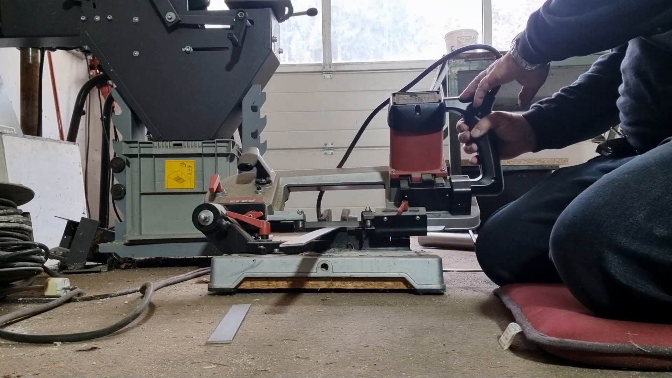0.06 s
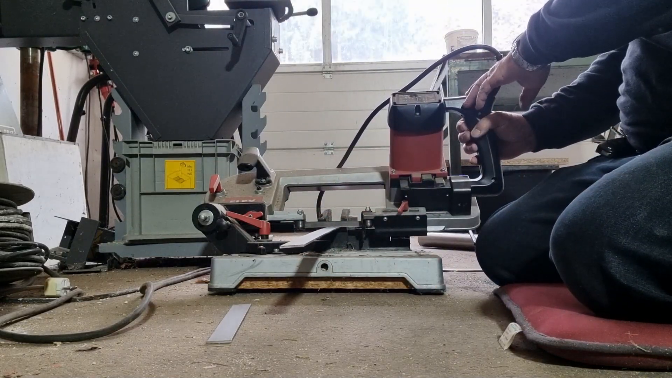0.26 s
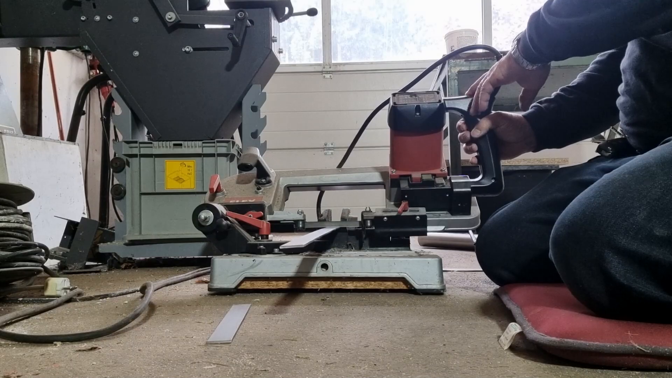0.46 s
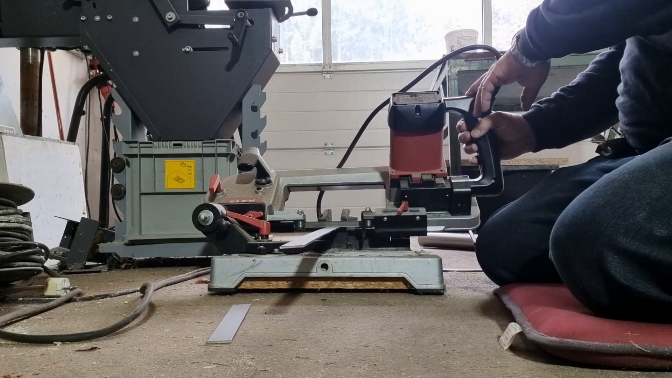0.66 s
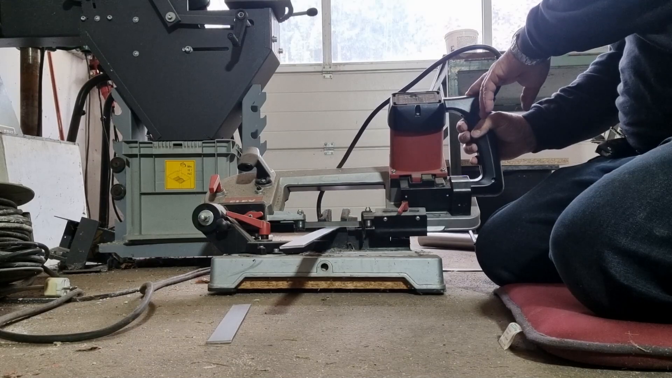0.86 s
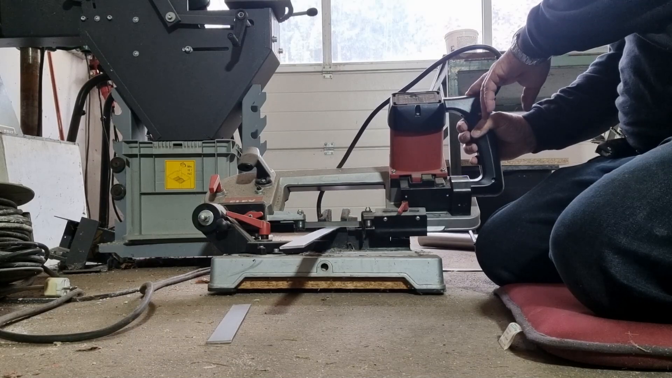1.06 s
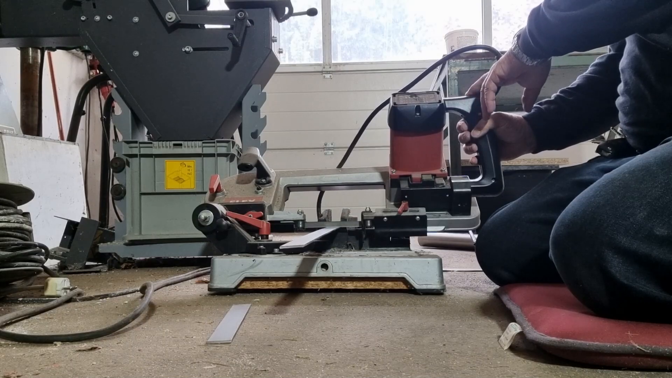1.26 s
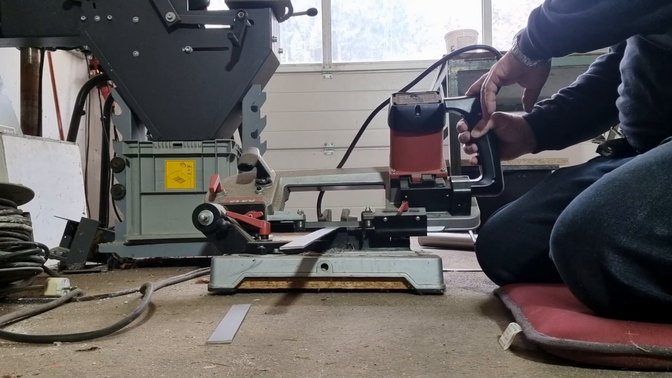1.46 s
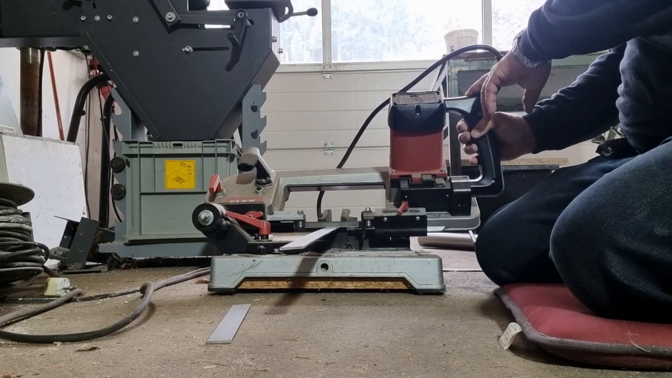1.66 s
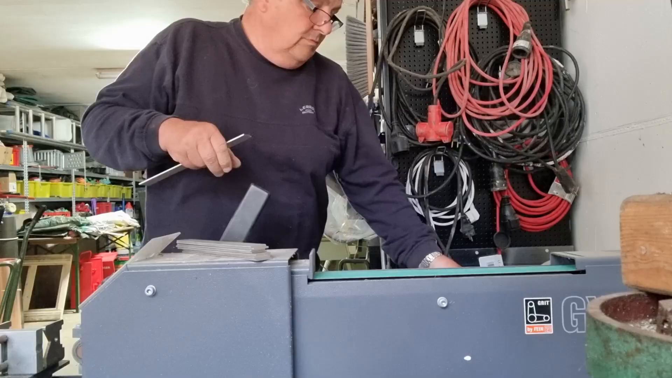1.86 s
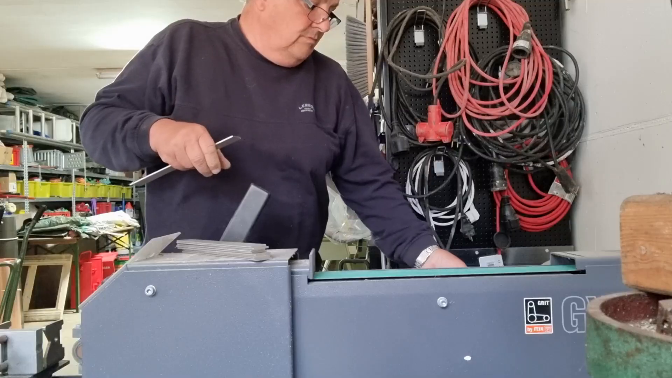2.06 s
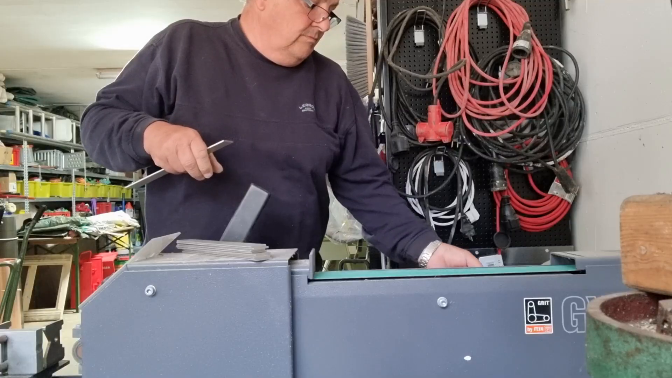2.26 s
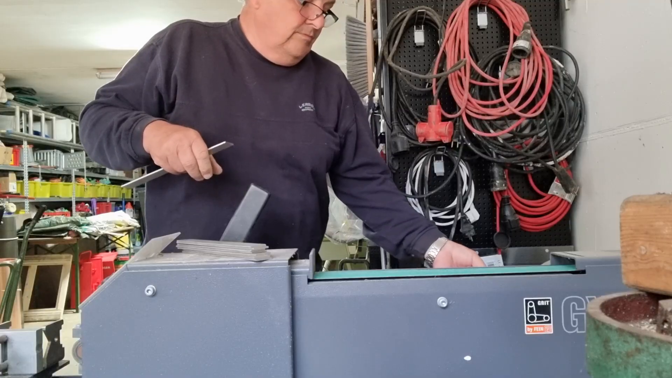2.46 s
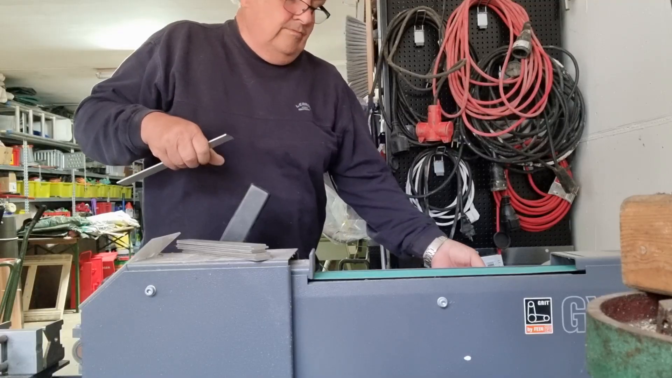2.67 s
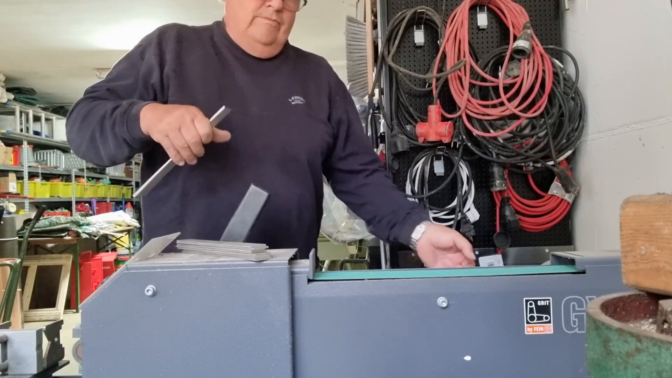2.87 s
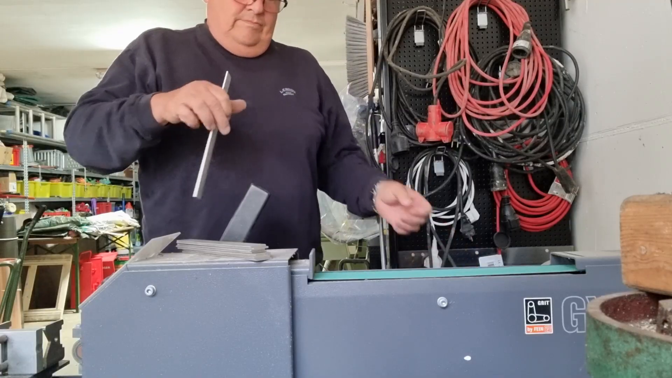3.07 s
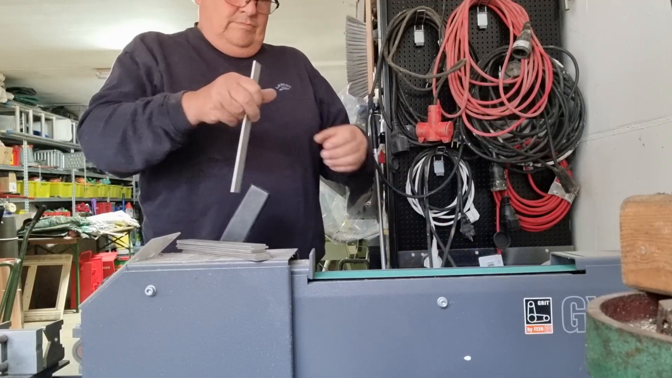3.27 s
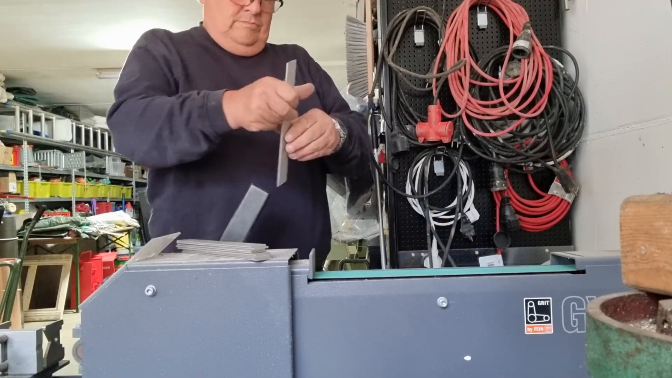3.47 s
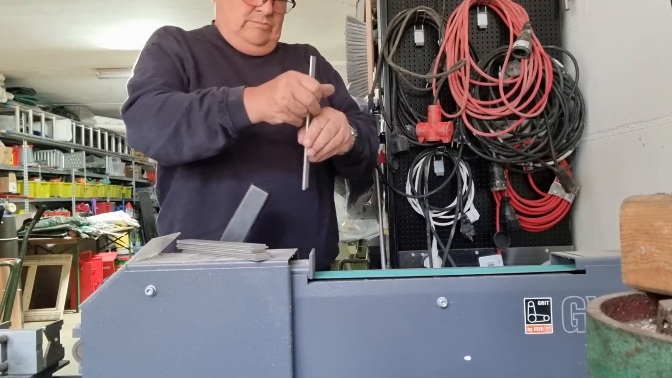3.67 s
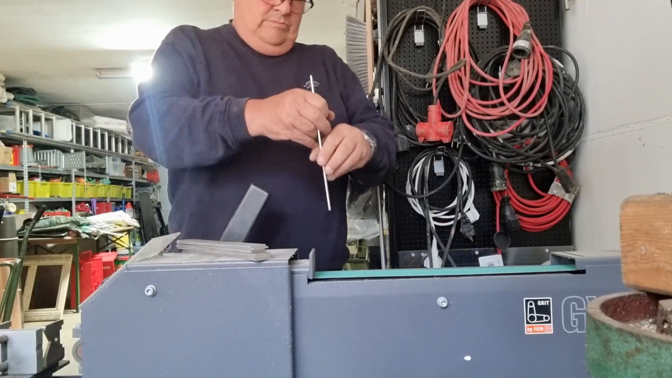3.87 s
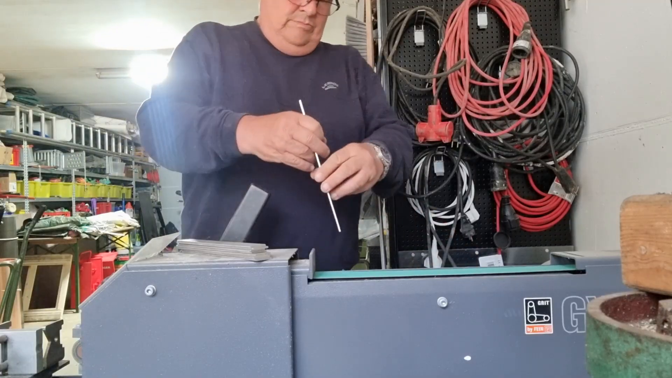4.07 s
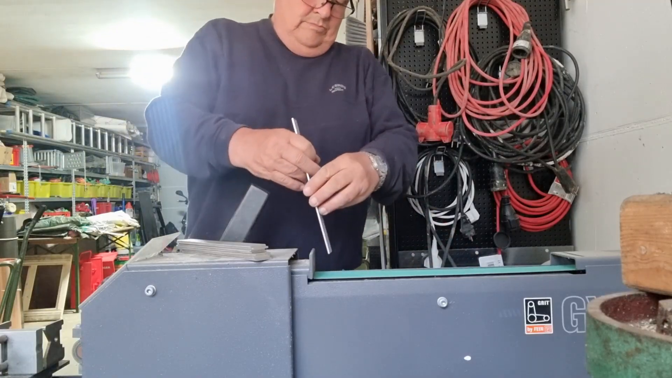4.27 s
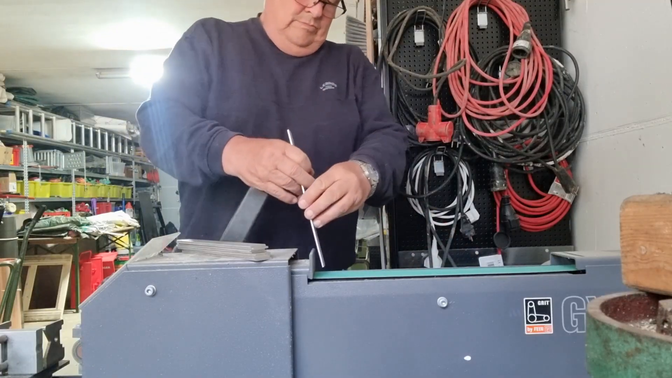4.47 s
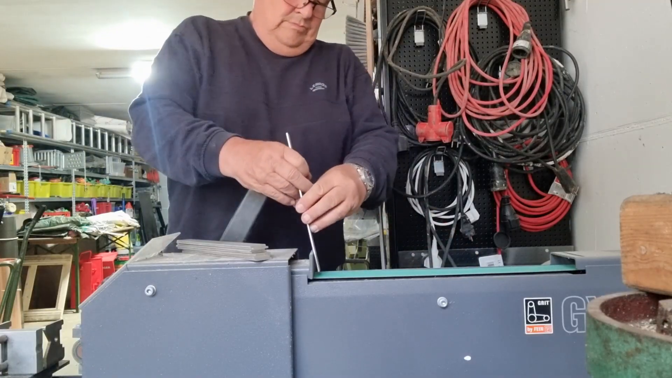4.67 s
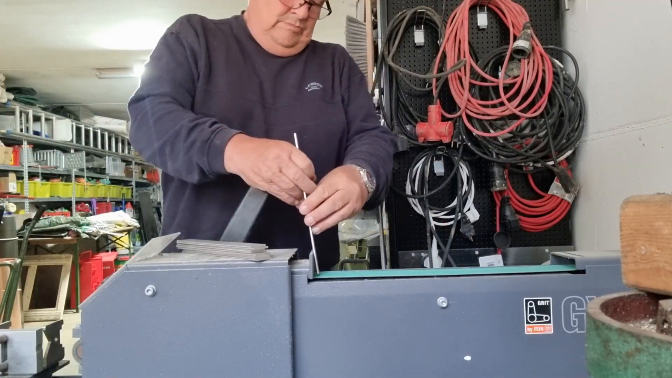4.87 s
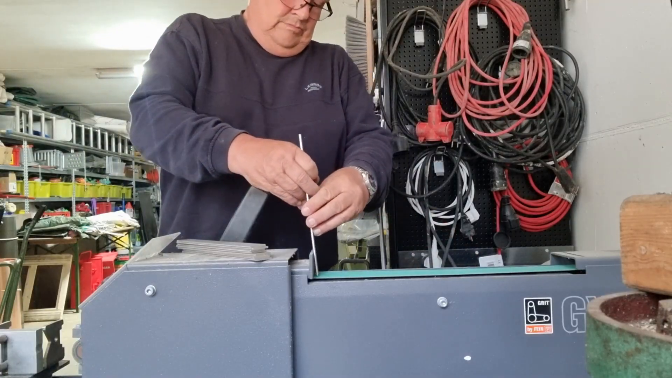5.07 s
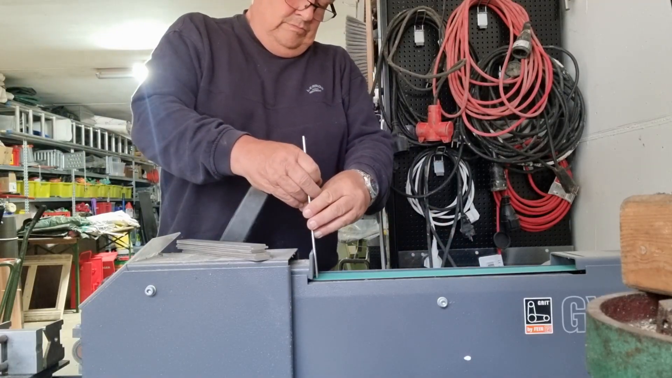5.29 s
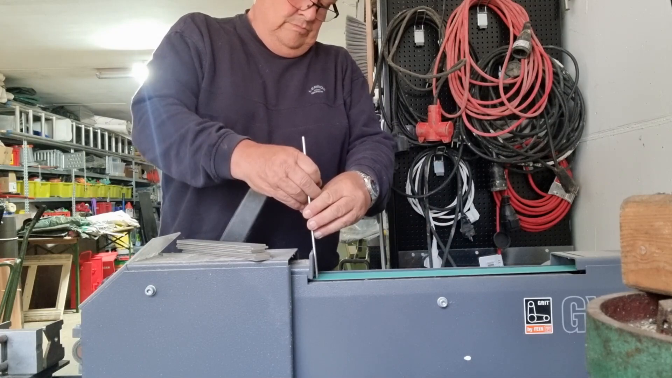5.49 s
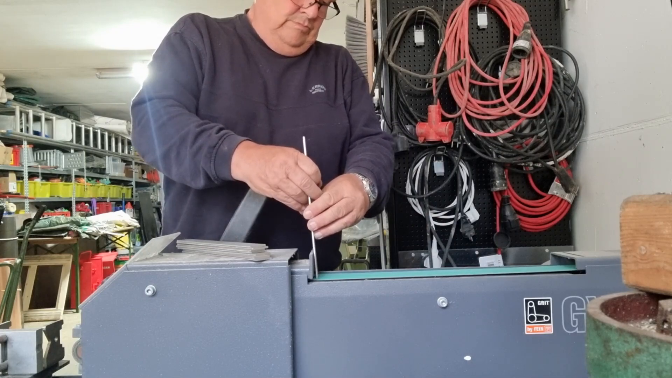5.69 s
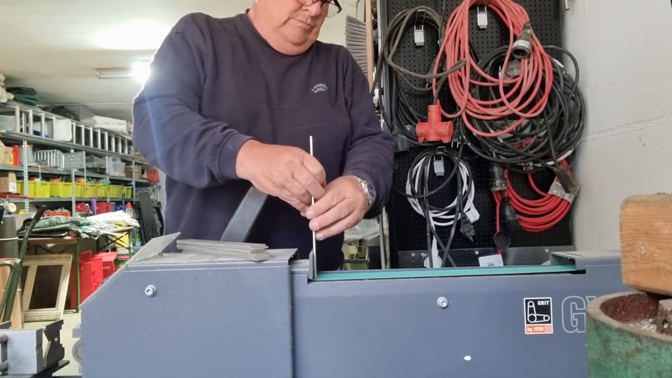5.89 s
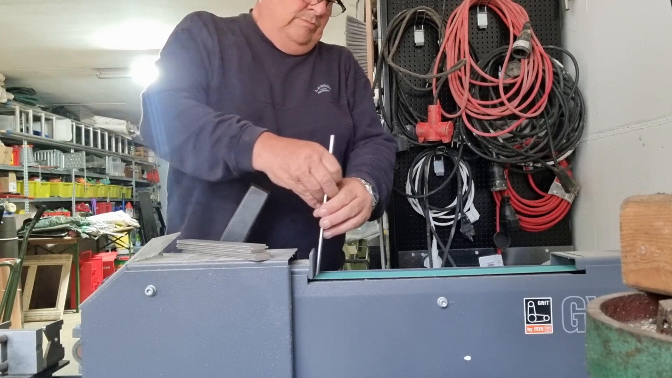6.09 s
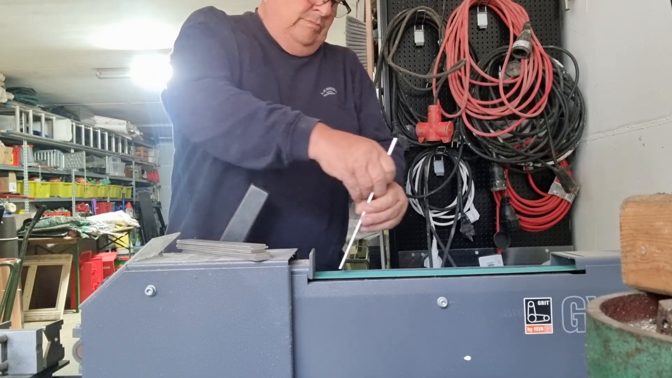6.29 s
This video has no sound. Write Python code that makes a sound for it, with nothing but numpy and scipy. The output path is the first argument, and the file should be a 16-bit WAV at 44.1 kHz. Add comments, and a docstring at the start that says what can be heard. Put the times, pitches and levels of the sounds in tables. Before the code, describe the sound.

In a home workshop, a small band saw cuts steel with a steady, slightly wavering gear whine over rough blade noise, then stops instantly. Near silence follows. A sharp switch snap rings its box, a belt grinder jolts on with a boom, panel clatter and brief squeaks, then hums and rushes with a quick regular seam knock. Finally a steel strip on the belt tears brightly and squeals. Close stereo camera microphone.

```python
"""A small band saw cuts steel in a home workshop and is cut off: gear tones sing over blade and frame noise.
In the hush a switch snaps and rings its box. A belt grinder lurches into motion with booms and squeaks;
it hums and rushes, and its belt seam knocks once a lap. Then a steel strip pressed on the belt tears,
squeals and rings. Tones are sines, the rest is shaped noise; a camera with two microphone ports listens."""
import sys
import numpy as np
from scipy import signal
from scipy.fft import rfft, irfft, next_fast_len
from scipy.io import wavfile
from scipy.ndimage import uniform_filter1d, map_coordinates

SR = 44100
rng = np.random.default_rng(int(sys.argv[2]) if len(sys.argv) > 2 else 0)


def transcribe(signal):
    """Save signal, clipped to [-1, 1], as a 16-bit WAV file at the path in sys.argv[1]."""
    frames = np.atleast_2d(signal).T
    limited = np.clip(frames, -1, 1)
    pcm = np.round(limited * 32767).astype(np.int16)
    wavfile.write(sys.argv[1], SR, pcm)


N = 279594
T = np.arange(N) / SR  # time of each sample in s
SAW_OFF, START, HUM_ON = 1.899, 2.594, 3.28  # s: saw stops, grinder motor kicks in, hum sets in

# how wide the grinder's sounds spread: f/Hz, side over mid/dB
BELT_SIDE = [(60, -6), (110, -6), (200, -15), (380, -9), (700, -3.5), (1290, -2.5), (2380, -1), (4400, -1),
             (8120, -0.5), (15000, -8.5)]
# how far they lean to the left port: f/Hz, left over right/dB
BELT_LEFT = [(60, 1.0), (110, 1), (200, 0), (380, 2), (700, 1.5), (1290, 0.5), (2380, 2.5), (4400, 1.5),
             (8120, 11.5), (15000, -2)]
BELT_PORTS = BELT_SIDE, BELT_LEFT
# the strip on the belt, base levels: t/s, tearing/dB, grit/dB, squeal/dB, high mode/dB
GRIND = [(5.18, -39, -36, -42, -44), (5.25, -24.5, -23.5, -34, -24), (5.4, -21, -19, -40, -25),
         (5.48, -20, -19, -35, -21), (5.57, -20.5, -23, -30, -32), (5.63, -18.5, -20.5, -30.5, -22),
         (5.75, -19, -23.5, -24.5, -35), (5.87, -20.5, -25.5, -21.5, -31), (5.96, -19.5, -23.5, -25.5, -41),
         (6.07, -22, -25.5, -24.5, -43), (6.13, -21.5, -20, -36, -31), (6.18, -27, -28, -53, -33),
         (6.26, -46, -43, -62, -49)]


def amp(db):
    """Turn decibels into a plain factor."""
    return 10 ** (np.asarray(db) / 20)


def along(points, hz):
    """Read a curve of (Hz, value) points on a log frequency axis."""
    f, v = np.transpose(points)
    return np.interp(np.log(hz + 1), np.log(f + 1), v)


def curves(rows):
    """One value per sample for each column after the time."""
    s, *cols = np.transpose(rows)
    return [np.interp(T, s, c) for c in cols]


def ramp(start, length):
    """A straight rise from 0 at the start to 1 after the length in s."""
    return np.clip((T - start) / length, 0, 1)


def bump(s, half):
    """A soft swell around a moment."""
    return np.exp(-((T - s) / half) ** 2)


def during(rows, fade):
    """Fade in from the first row's time and out from the last row's time."""
    return ramp(rows[0][0], fade) * (1 - ramp(rows[-1][0], fade))


def wobble(rate):
    """A smooth random curve, rate knots a second."""
    knots = rng.standard_normal(int(N * rate / SR) + 4)
    return map_coordinates(knots, [T * rate])


def colour(points):
    """Gain over frequency that follows a curve in dB."""
    return lambda hz: amp(along(points, hz))


def modes(table):
    """Gain of a set of resonances (centre Hz, width Hz, dB), added in power."""
    def gain(f):
        power = 0
        for centre, width, db in table:
            peak = (f * width) ** 2 / ((centre * centre - f * f) ** 2 + (f * width) ** 2)
            power = power + amp(2 * db) * peak ** 1.7
        return np.sqrt(power)
    return gain


def noise(gain, ports, patchy_db=0., shifted=.5):
    """Stereo noise with random patches; its mid has rms 1. Part of the side is the mid itself, in or out of phase."""
    z = signal.stft(rng.standard_normal((2, N)), nperseg=512)[2]
    field = uniform_filter1d(rng.standard_normal(z.shape[1:]), size=3, axis=0)
    field = uniform_filter1d(field, size=5, axis=1)
    patches = amp(patchy_db * field / field.std())
    pair = signal.istft(z * patches, nperseg=512)[1][:, :N]
    m = next_fast_len(N)
    hz = np.fft.rfftfreq(m, 1 / SR)
    a, b = rfft(pair, m) * gain(hz)
    side = amp(along(ports[0], hz))
    # the share of the side that copies the mid sets the left-right balance
    balance = np.tanh(along(ports[1], hz) * np.log(10) / 20)
    shared = np.clip(balance * (1 + side ** 2) / (2 * side), -.8, .8)
    turn = np.clip(shifted, 0, 1) * np.exp(-(hz / 2500) ** 2)  # only long waves keep a steady lag between the ports
    lagging_and_unrelated = 1j * turn * a + np.sqrt(1 - turn ** 2) * b
    rest = np.sqrt(1 - shared ** 2) * lagging_and_unrelated
    mid, side = irfft([a, side * (shared * a + rest)], m)[:, :N]
    return np.array([mid + side, mid - side]) / mid.std()


def tone(cycles, left_db, lead):
    """A sine of rms about 1 as both ports hear it; the left leads by lead radians."""
    phase = 2 * np.pi * (cycles + rng.random())
    left = amp(left_db / 2) * np.sin(phase + lead / 2)
    right = amp(-left_db / 2) * np.sin(phase - lead / 2)
    return np.sqrt(2) * np.array([left, right])


def saw():
    """Sums and differences of the motor and gear turns sing over the noise of blade and frame."""
    # the saw under changing load: t/s, motor turns/Hz, lower side tone/dB, 2nd mesh tone/dB, commutator whistle/dB
    load = [(0.0, 264.1, -27, -44, -28), (0.085, 263.6, -29, -30, -16.5), (0.19, 262.8, -31, -35, -42),
            (0.3, 263.7, -32, -29.5, -30), (0.4, 262.4, -25, -25.5, -28.5),
            (0.546, 261.75, -24, -37, -15.5), (0.69, 261.6, -22.5, -31, -18),
            (0.75, 261.3, -27, -28.5, -21.5), (1.02, 262.2, -25.5, -31, -20),
            (1.14, 262.7, -24.5, -35, -28), (1.274, 262.85, -32, -30, -40), (1.416, 262.9, -25, -32.5, -31),
            (1.51, 262.9, -30, -43.5, -28.5), (1.57, 263.3, -29.5, -33, -22.5),
            (1.732, 263.5, -28.5, -26, -17), (1.8, 262.9, -33, -26.5, -34), (1.89, 262.9, -27, -32, -28)]
    # side tone, mesh, 2nd, 3rd, whistle: left over right/dB, left leads/rad
    strong_places = [(2.8, 0.3), (2.7, 0.7), (1.8, -0.3), (2.1, 0.3), (6.6, -2.7)]
    # side tone, mesh, 2nd, 3rd, as multiples of: motor turns, gear turns
    strong_turns = [(4, -1), (4, 0), (8, 0), (12, 0)]
    # weak tones: base level/dB, left over right/dB, left leads/rad
    weak_places = [(-51.1, -1.7, 0.2), (-39.0, -1.7, -0.5), (-39.8, 0.1, 0.0), (-42.3, -0.2, -0.2),
                   (-36.5, -0.5, -0.1), (-43.0, -3.1, 1.5), (-38.2, 3.9, -0.0), (-40.2, 4.3, 0.8),
                   (-35.9, -2.2, 0.3), (-41.6, 8.6, 0.9), (-39.6, 2.0, -0.1), (-47.0, -0.0, -2.5),
                   (-42.3, 0.1, 0.8), (-38.0, 1.5, -0.3), (-37.1, 3.7, 0.4), (-42.9, 3.9, 0.7),
                   (-41.8, 2.7, 1.8), (-41.6, 5.9, 1.4), (-38.8, 5.2, -3.0), (-33.5, 1.6, 2.8),
                   (-39.7, 3.3, 0.0), (-38.5, 2.7, -0.3), (-38.7, 10.5, -2.7), (-57.7, -0.3, 0.0),
                   (-44, 10, -2.6), (-47, 1, 0.8)]
    # the same weak tones as multiples of: motor turns, gear turns
    weak_turns = [(0, 1), (1, 0), (0, 2), (1, 1), (2, 0), (4, -2), (3, 0), (5, -1), (4, 1), (5, 0), (4, 2),
                  (6, 0), (8, -2), (8, -1), (8, 1), (9, 0), (8, 2), (12, -1), (12, 1), (15, 0), (18, 0),
                  (21, 0), (26, -3), (48, 0), (12, -3), (10, -5)]
    # noise shape of the frame: f/Hz, relative level per Hz/dB
    frame_shape = [(18, -82.5), (30, -55.5), (146, -19.5), (206, -19), (254, -11.5), (466, -8), (554, 4),
                   (826, -14), (901, -3.5), (966, -9.5), (1050, -5.5), (1130, -4.5), (1570, -13),
                   (1900, -13), (2470, -47.5), (4180, -120)]
    # noise shape of the cutting teeth: f/Hz, relative level per Hz/dB
    teeth_shape = [(880, -42.5), (1500, -15.5), (1670, -23), (2160, -3.5), (2560, -8), (3060, -8),
                   (3310, -8.5), (4420, -10.5), (6120, -9), (7690, -23), (8320, -35.5), (9280, -29),
                   (12600, -26), (15100, -20.5), (16000, -31)]
    # width: f/Hz, side over mid/dB
    saw_side = [(60, -10), (110, -10.5), (200, -18.5), (380, -15), (700, -6.5), (1290, -3.5), (2380, 1.5),
                (4400, 5), (8120, -3), (15000, -15)]
    # lean: f/Hz, left over right/dB
    saw_left = [(60, -3), (110, 0), (200, -2.5), (380, 1), (700, -1), (1290, -0.5), (2380, 2.5),
                (4400, 1.5), (8120, 3.5), (15000, -0.5)]
    ports = saw_side, saw_left
    gear_ratio, bar_count = .6026, 24  # gear turns per motor turn; commutator bars
    middle_hz = 262.6  # motor turns a second
    mesh_db, mesh_db_per_hz, third_db, third_db_per_hz = -26.5, 2, -33.5, 3.5  # dB at middle_hz, dB per Hz
    frame_db, frame_shudder_db, teeth_db, teeth_drift_db = -26, 1.3, -27.5, 0.65

    motor_hz, side_db, second_db, whistle_db = curves(load)
    free = motor_hz - middle_hz  # mesh and 3rd tone swell as the motor runs freer
    levels = (side_db,
              mesh_db + mesh_db_per_hz * free + 1.3 * wobble(9),
              second_db,
              third_db + third_db_per_hz * free + 1.7 * wobble(7.9))
    turns = np.cumsum(motor_hz + .37 * wobble(40)) / SR
    whistle_level = amp(whistle_db + .8 * wobble(23))
    whistle_cycles = np.cumsum(bar_count * motor_hz + 4 * wobble(40)) / SR
    out = whistle_level * tone(whistle_cycles, *strong_places[-1])
    for (motor, gear), place, db in zip(strong_turns, strong_places, levels):
        level = amp(db + 0.92 * wobble(45))
        loose_turns = turns + .006 * wobble(60)  # play in the gears blurs high tones most
        out += level * tone((motor + gear * gear_ratio) * loose_turns, *place)
    for (motor, gear), (db, *place) in zip(weak_turns, weak_places):
        flutter_db = 1.8 * wobble(10) + 1.5 * wobble(50) - 1.5
        loose_turns = turns + 0.003 * wobble(60)
        out += amp(db + flutter_db) * tone((motor + gear * gear_ratio) * loose_turns, *place)
    throb = 1 + 0.089 * np.sin(2 * np.pi * gear_ratio * turns)  # the gear loads the blade once a turn
    frame_level = amp(frame_db + frame_shudder_db * wobble(25))
    out += frame_level * noise(colour(frame_shape), ports, patchy_db=2.0, shifted=.5)
    teeth_level = amp(teeth_db + teeth_drift_db * wobble(8.8)) * throb
    out += teeth_level * noise(colour(teeth_shape), ports, patchy_db=2.0, shifted=.4)
    return out * np.clip((SAW_OFF - T) / 0.0041, 0, 1)


def hush():
    """The hush is faint noise that fades quickly to a steady floor after the saw."""
    # noise shape of the air: f/Hz, relative level per Hz/dB
    air_shape = [(18, -25), (30, -3), (97, -12), (132, -3), (231, -25.5), (892, -31), (1450, -23),
                 (1770, -34.5), (6000, -37.5), (7800, -70.5), (13200, -120)]
    air_db, fade_db, fade_db_per_s = -79, -61, 76  # steady floor; the fading noise and its fall
    level = amp(air_db) + amp(fade_db - fade_db_per_s * np.maximum(T - SAW_OFF, 0))
    return level * ramp(SAW_OFF, 0.004) * noise(colour(air_shape), BELT_PORTS, patchy_db=3.5)


def switch():
    """The snap rings the switch box; each frequency dies in the shop at its own speed."""
    # the snap: t/s, base level/dB
    snap_at, snap_db = (2.305, -29.5)
    # noise shape of the snap: f/Hz, relative level per Hz/dB
    snap_shape = [(120, -82), (200, -48), (986, -21), (1400, -16.5), (1480, -13.5), (1870, -22.5),
                  (2130, -7.5), (2380, -16), (3760, -12), (6640, -15.5), (8120, -30), (14600, -17),
                  (16000, -18)]
    # how long the shop rings: f/Hz, time to fall 60 dB/s
    shop_decay = [(250, .5), (660, 0.57), (1740, 0.62), (4590, 0.48), (12100, 0.22)]
    # ringing of the switch box: f/Hz, width/Hz, level/dB, time to fall 60 dB/s
    housing = [(427, 46, -55.5, 0.75), (678, 30, -54, 0.48), (2140, 108, -31.5, 0.26),
               (3920, 100, -41.5, 0.52), (6520, 99, -38, 0.14)]
    hz, t, z = signal.stft(noise(colour(snap_shape), BELT_PORTS, patchy_db=3.5), SR, nperseg=128)
    after = np.maximum(t - snap_at, -.2)
    shop_answer = amp(-5 - 60 * after / along(shop_decay, hz)[:, None])
    near_sound = amp(-3.5 - 60 * after / 0.13)
    swell = amp(-21 + 1100 * after)  # a very short noise swell leads into the snap
    envelope = np.where(after > 0, shop_answer + near_sound, swell)
    snap = amp(snap_db + 2) * signal.istft(z * envelope, SR, nperseg=128)[1][:, :N]
    first = round(snap_at * SR)
    ringing = slice(first, first + SR // 2)
    t = T[:SR // 2]
    for f, width, level_db, t60 in housing:
        ring = signal.lfilter(*signal.iirpeak(f, f / width, SR), rng.standard_normal(SR // 2))
        level = amp(level_db - 60 * t / t60) * np.minimum(t / 0.0048, 1)
        snap[:, ringing] += level * ring / ring.std()
    return snap


def start_up():
    """The motor's jerk shakes cabinet and panels while the belt slips."""
    # boom, panel, clatter: rise/s, hold/s, level/dB, fall/dB per s
    lurch = [(0.028, .07, -25.5, 65), (0.056, .02, -21.5, 80), (0.029, 0.073, -25.5, 123)]
    # resonances of the cabinet: f/Hz, width/Hz, relative level/dB
    boom_modes = [(60, 40, -14), (132, 29, 5), (260, 130, -8)]
    # resonances of the clatter: f/Hz, width/Hz, relative level/dB
    clatter_modes = [(302, 88, -3.5), (370, 65, 4), (515, 57, 1.5), (683, 33, 5), (765, 57, 5.5),
                     (1120, 400, -9.5), (450, 430, -10)]
    # the belt slipping on the drum: t/s, f/Hz, level/dB, half length/s
    squeaks = [(2.722, 3092, -37, 0.024), (2.73, 1566, -39, 0.026), (2.796, 2120, -46, .012),
               (2.924, 1176, -35.5, .02), (2.977, 2270, -35, 0.026)]
    panel_hz, rattle_db = 208, -42
    envelopes = []
    for rise, hold, db, fall_db in lurch:
        falling = np.maximum(T - START - rise - hold, 0)
        envelopes.append(ramp(START, rise) ** 3 * amp(db - fall_db * falling))
    boom, panel, clatter = envelopes
    # some clatter lingers until the hum sets in
    clatter = clatter + amp(rattle_db) * ramp(START, .03) ** 3 * (1 - ramp(HUM_ON - .25, 0.28))
    out = boom * noise(modes(boom_modes), BELT_PORTS)
    out += clatter * noise(modes(clatter_modes), BELT_PORTS, patchy_db=2.0)
    panel_level = panel * amp(0.67 * wobble(40))
    out += panel_level * tone(np.cumsum(panel_hz + 5 * wobble(30)) / SR, .3, 0.11)
    for s, hz, db, half in squeaks:
        level = amp(db + 2.7 * wobble(60)) * bump(s, half)
        out += level * tone(np.cumsum(hz + 15 * wobble(80)) / SR, 1.5, .3)
    return out


def grinder():
    """Motor hum, the rush of the belt in its guard and the seam's knock on every lap."""
    # noise shape of the belt's rush: f/Hz, relative level per Hz/dB
    rush_shape = [(18, -70), (30, -36), (64, -24.5), (100, -15.5), (150, -6.5), (400, -8), (470, -22),
                  (600, -19), (720, -12), (890, -14.5), (1130, -9.5), (4080, -12.5), (6720, -19.5),
                  (8300, -36.5), (16000, -25.5)]
    # base level of the rush as the belt runs up: t/s, level/dB
    run_up = [(2.6, -32), (2.62, -35.5), (2.75, -36.5), (2.88, -34), (2.95, -31.5), (3.1, -30.5),
              (3.3, -28), (3.6, -28)]
    # resonances of the sheet-metal guard: f/Hz, width/Hz, relative level/dB
    guard_modes = [(275, 20, -3), (365, 20, -6), (490, 10, -6), (528, 18, -2), (584, 12, -8), (732, 60, -1),
                   (784, 14, 1), (1010, 12, 0), (1130, 25, 0), (1210, 60, -2), (1885, 20, -4),
                   (1958, 20, -2), (2310, 45, -2), (2552, 25, 0), (2650, 20, -3), (2845, 45, -1),
                   (3188, 35, 0), (3530, 35, -5), (3962, 40, -2), (4200, 50, -3), (4410, 25, -6),
                   (4800, 22, -2), (5220, 25, -5), (5620, 30, -8), (5940, 70, -10), (6090, 20, -7),
                   (6600, 210, -15)]
    # the seam: t of one knock/s, lap rate/Hz
    knock_at, laps_per_s = (3.425, 6.93)
    # what the seam rings: f/Hz, width/Hz, relative level/dB
    platen_modes = [(724, 104, -6), (786, 31, -0.5), (512.6, 28, -5), (1100, 23, -9.5)]
    hum_hz, hum_rise_s, hum_db, hum_sag_db_per_s, octave_db = 123, 0.074, -37, .3, -42.5
    early_start_db = -11.5  # the hum is weaker by this in the run-up, its octave by 1.2 times this
    guard_db, seam_db = -3, -4.5  # over the rush
    slack_start_db, taut_at, taut_s = -9, 2.8, 0.31  # guard and seam are weaker until the belt pulls taut
    sink_full_db, sink_s, return_s = 5.5, .9, .18
    hum_sinks = .4  # share of the sinking that the hum takes

    # hum and rush sink slowly while the strip is on and come back after it
    sink_db = -sink_full_db * ramp(GRIND[0][0], sink_s) * (1 - ramp(GRIND[-1][0], return_s))
    early_db = early_start_db * (1 - ramp(HUM_ON, hum_rise_s))
    steady_db = hum_db - hum_sag_db_per_s * np.maximum(T - HUM_ON, 0) + early_db
    cycles = np.cumsum(hum_hz + .4 * wobble(8)) / SR
    hum_level = amp(steady_db + 1.0 * wobble(6.9) + 1.6 * during(GRIND, .3) * wobble(14))
    hum = hum_level * tone(cycles, .2, 0.15)
    hum += amp(octave_db + 1.2 * early_db + 2.4 * wobble(8)) * tone(2 * cycles, .5, .1)
    slack_db = slack_start_db * (1 - ramp(taut_at, taut_s))
    lap = (T - knock_at) * laps_per_s + .5  # each knock peaks halfway through a count
    knock = np.exp(-((lap % 1 - .5) / 0.14) ** 2) * amp(1.0 * wobble(5))
    belt = noise(colour(rush_shape), BELT_PORTS, patchy_db=2.0, shifted=.4)
    belt += amp(guard_db + slack_db) * noise(modes(guard_modes), BELT_PORTS, patchy_db=2.5, shifted=.3)
    belt += amp(seam_db + slack_db) * knock * noise(modes(platen_modes), BELT_PORTS, shifted=.3)
    belt_level = amp(curves(run_up)[0] + sink_db + 0.6 * wobble(7) + 0.61 * wobble(16))
    return (amp(hum_sinks * sink_db) * hum + belt_level * belt) * ramp(START, 0.021) ** 3


def grinding():
    """Grit sprays off the strip, tears at it in a chattering contact and rings its modes."""
    # noise shape of the tearing: f/Hz, relative level per Hz/dB
    tear_shape = [(1350, -33), (2300, -14), (2590, -6), (2970, -4.5), (4000, -0.5), (4630, -3.5),
                  (5300, -1), (6600, -10), (7590, -14), (8000, -29), (10400, -58), (17600, -120)]
    # noise shape of the grit: f/Hz, relative level per Hz/dB
    grit_shape = [(3530, -30), (6000, -8), (6650, -1), (7610, -16), (8030, -20), (8610, -13.5),
                  (11000, -14), (12400, -7.5), (13400, -5.5), (15100, -6.5), (16000, -9)]
    # noise shape of the deep scrape: f/Hz, relative level per Hz/dB
    drag_shape = [(240, -23), (400, -5), (462, -17), (506, -6.5), (734, -6.5), (810, -14), (1100, -10),
                  (1520, -8), (2450, -4), (3180, -28), (5390, -120)]
    # resonances of the strip: f/Hz, width/Hz, relative level/dB
    strip_modes = [(750, 50, -10), (1120, 25, -5), (1885, 40, -6), (2165, 30, -5), (2358, 35, -3),
                   (2660, 30, -2), (2853, 30, -7), (3230, 110, -5), (3505, 37, -3), (4040, 110, -4),
                   (4850, 100, -5), (5140, 60, -4), (5240, 60, -5), (5950, 100, -4), (6330, 40, -3),
                   (7354, 29, -9)]
    # resonances around the squeal: f/Hz, width/Hz, relative level/dB
    squeal_rings = [(2540, 33, -2), (2606, 32, 3), (2590, 30, -16)]
    # what the contact shakes in the cabinet: f/Hz, width/Hz, relative level/dB
    shaken_modes = [(190, 60, 0), (370, 70, -2), (600, 80, -4)]
    # the whole strip flexes: t/s, base level/dB, half length/s
    bends = [(5.52, -39, .04), (5.677, -29.5, 0.027), (5.784, -29.5, 0.049), (5.926, -25, 0.054),
             (6.05, -32, .04)]
    # width: f/Hz, side over mid/dB
    strip_side = [(60, -6), (110, -15), (200, -17), (380, -6), (700, -11), (1290, -3), (2380, 0), (4400, 0),
                  (8120, 0.5), (15000, -4.5)]
    # lean: f/Hz, left over right/dB
    strip_left = [(60, 1.0), (110, -0.5), (200, 0.0), (380, -4), (700, -1.0), (1290, -3), (2380, 2.5),
                  (4400, 1.5), (8120, 9.5), (15000, 0)]
    ports = strip_side, strip_left
    squeal_hz, sing_hz, bend_hz = 2582, 6465, 272
    bounce_hz, bounce_at = 41.5, 5.87  # pulses a second; one pulse falls about here (s)
    drag_base_db, drag_follows = -31, 0.79  # scrape at a squeal of -30 dB; its dB for each dB of squeal
    shake_db = -16.5  # under the tearing

    tear_db, grit_db, squeal_db, sing_db = curves(GRIND)
    chatter = amp(0.46 * wobble(35) + 0.5 * wobble(400))
    tear = amp(-2.5) * noise(colour(tear_shape), ports, patchy_db=3.0, shifted=0.34)
    tear += amp(-3.0) * noise(modes(strip_modes), ports, patchy_db=2.0, shifted=.3)
    grit = amp(grit_db + 0.82 * wobble(15)) * noise(colour(grit_shape), ports, patchy_db=4.0)
    out = chatter * (grit + amp(tear_db) * tear)
    # harder pressure, deeper scrape: it grows with the squeal
    drag_db = drag_base_db + drag_follows * (squeal_db + 30) + .8 * wobble(15)
    out += chatter * amp(drag_db) * noise(colour(drag_shape), ports, patchy_db=2.5, shifted=0.18)
    # the strip squeals in pulses as it bounces on the belt
    bounces = bounce_hz * (T - bounce_at) + 0.054 * wobble(12)
    bounce = 1 + 1.1 * np.cos(2 * np.pi * bounces)
    squeal_cycles = np.cumsum(squeal_hz + 14 * wobble(50)) / SR
    squeal = amp(-7.0 + 1.5 * wobble(44)) * bounce * tone(squeal_cycles, 2.5, .4)
    squeal += amp(-4) * noise(modes(squeal_rings), ports, shifted=0.45)
    out += amp(squeal_db + 1.7 * wobble(11)) * squeal
    # the high mode shifts with the grip
    sing_cycles = np.cumsum(sing_hz + 35 * wobble(8) + 60 * wobble(120)) / SR
    out += amp(sing_db + 2.8 * wobble(110)) * tone(sing_cycles, 7.4, 0.96)
    out += amp(tear_db + shake_db) * noise(modes(shaken_modes), ports, patchy_db=3.0)
    bend_level = sum(amp(db) * bump(s, half) for s, db, half in bends) * amp(2.5 * wobble(40))
    bend = bend_level * tone(np.cumsum(bend_hz + 4 * wobble(30)) / SR, -.7, 0.37)
    return during(GRIND, 0.038) * out + bend


def scene():
    """All the sounds of the workshop added together."""
    return saw() + hush() + switch() + start_up() + grinder() + grinding()


def record(dry):
    """Faint circuit hiss, rounded peaks, and nothing above the camera's band limit."""
    top_hz = 15830
    x = dry + amp(-98) * rng.standard_normal(dry.shape)
    x = x / (1 + np.abs(x) ** 6) ** (1 / 6)
    m = next_fast_len(N + SR // 2)
    edge = np.clip((top_hz - np.fft.rfftfreq(m, 1 / SR)) / 120, 0, 1)  # the edge is 120 Hz wide
    return irfft(rfft(x, m) * np.sin(edge * np.pi / 2) ** 2, m)[:, :N]


dry = scene()
out = record(dry)
transcribe(out)
```